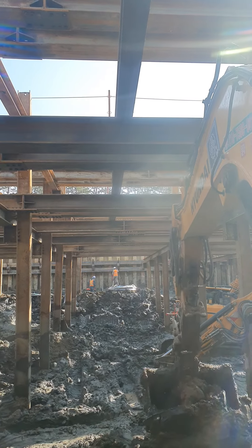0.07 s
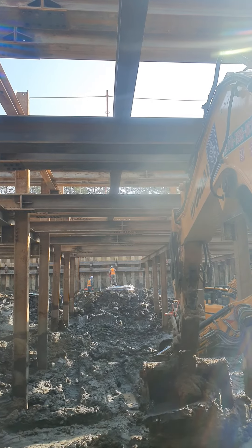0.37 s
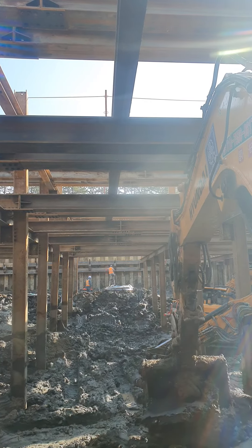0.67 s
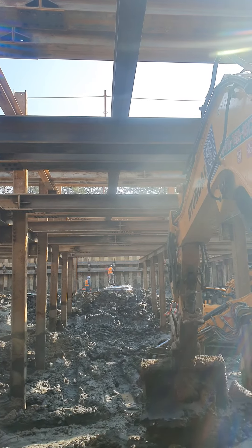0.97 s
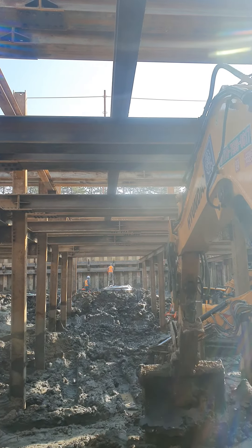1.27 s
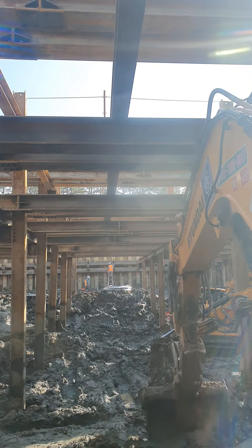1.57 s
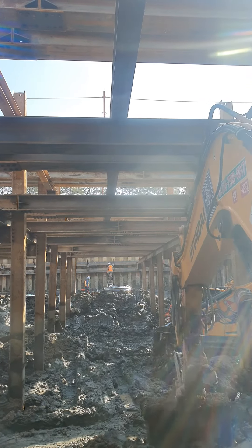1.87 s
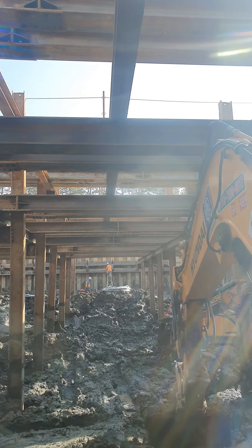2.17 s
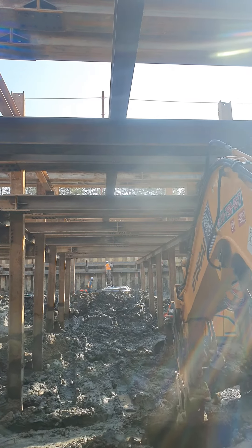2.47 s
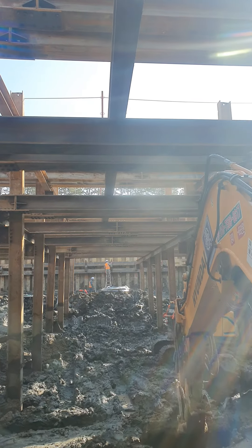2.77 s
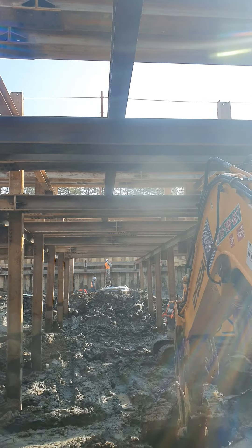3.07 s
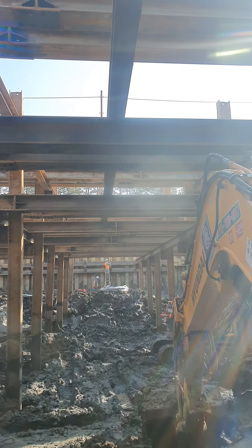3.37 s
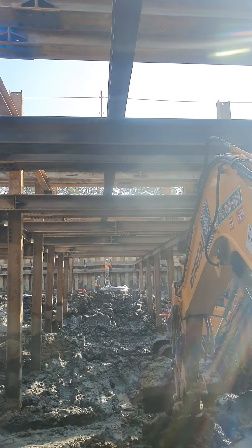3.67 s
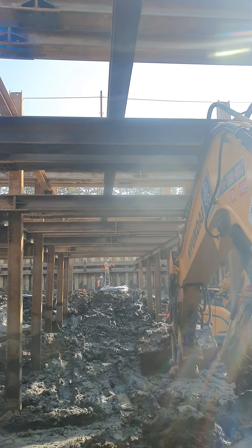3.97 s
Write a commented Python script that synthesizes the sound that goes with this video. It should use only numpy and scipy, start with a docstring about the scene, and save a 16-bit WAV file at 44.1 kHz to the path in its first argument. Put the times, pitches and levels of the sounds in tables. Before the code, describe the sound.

An excavator's diesel engine drones and clatters steadily, with a few bucket knocks.

```python
"""A building pit: an excavator digs mud under steel struts. Its four-cylinder diesel drones and clatters,
beating against a second engine further off. Pump pistons hum, valves hiss as the arm moves, a faint whine
follows the crank and the site rumbles. Slack bucket pins knock and the pit answers; the bucket scrapes
once through wet spoil. Reflections between the struts comb the clatter and hiss."""
import sys
import numpy as np
from scipy import signal
from scipy.fft import rfft, irfft, dct
from scipy.io import wavfile

SR = 44100
rng = np.random.default_rng(int(sys.argv[2]) if len(sys.argv) > 2 else 0)


def transcribe(signal):
    """Save signal, clipped to [-1, 1], as a 16-bit WAV file at the path in sys.argv[1]."""
    frames = np.atleast_2d(signal).T
    limited = np.clip(frames, -1, 1)
    pcm = np.round(limited * 32767).astype(np.int16)
    wavfile.write(sys.argv[1], SR, pcm)


N = 176400
TIME_S = np.arange(N) / SR
BIN_HZ = np.arange(N // 2 + 1) * SR / N
WAVER_DB, WAVER_HZ = 2, 3.9  # weak tones

# Phase between the two pickup ports. Each row: frequency in Hz, left minus right in radians.
PORT_PHASE = [(150, 0), (290, -1), (575, -1.87), (1100, -2.5), (5000, -5)]


def undb(db):
    """Decibels to gain."""
    return 10 ** (np.asarray(db) / 20)


def unit(x):
    """Scale to rms 1."""
    return x / np.sqrt(np.mean(x ** 2))


def curve(table, column=1):
    """One column of a time table at every sample."""
    rows = np.array(table, float)
    return np.interp(TIME_S, rows[:, 0], rows[:, column])


def per_bin(table):
    """A frequency table at every spectral bin."""
    rows = np.array(table, float)
    return np.interp(np.log(BIN_HZ + 1e-3), np.log(rows[:, 0]), rows[:, 1])


def colour(x, spectrum):
    """Filter, then scale to rms 1. Each spectrum row: frequency in Hz, relative density in dB."""
    return unit(irfft(rfft(x) * undb(per_bin(spectrum)), N))


def noise(spectrum):
    """Coloured noise on three paths."""
    return colour(rng.standard_normal((3, N)), spectrum)


def walk(corner_hz):
    """Slow random drift, rms 1."""
    return unit(irfft(rfft(rng.standard_normal(N)) * (BIN_HZ > 0) / (1 + (BIN_HZ / corner_hz) ** 4), N))


def tone(turns):
    """Sine of rms 1, random starting phase."""
    return np.sqrt(2) * np.sin(2 * np.pi * (turns + rng.random()))


def ports(turns):
    """Stereo sine of rms 1 from the right; the left port lags."""
    mean_hz = (turns[-1] - turns[0]) * SR / N
    lead_rad = per_bin(PORT_PHASE)[int(mean_hz * N / SR)]
    return np.sqrt(2) * np.cos(2 * np.pi * turns + np.array([[lead_rad], [-lead_rad]]) / 2)


def spread(paths):
    """Mix three paths to stereo: direct (left lags), left reflection, right reflection."""
    # Each row: frequency in Hz, share of power arriving directly.
    direct_share = [(120, 1), (250, 0.7), (600, 0.68), (1200, 0.66), (2400, 0.12)]
    share = np.clip(per_bin(direct_share), 0, 1)
    shift = np.exp(.5j * per_bin(PORT_PHASE))
    direct = rfft(paths[0]) * np.array([shift, 1 / shift]) * np.sqrt(share)
    return irfft(direct + rfft(paths[1:]) * np.sqrt(1 - share), N)


def swells(events, spectrum):
    """Stereo noise with one Gaussian swell per event."""
    envelope = sum(undb(db) * np.exp(-.5 * ((TIME_S - centre_s) / width_s) ** 2)
                   for centre_s, width_s, db in events)
    return spread(noise(spectrum)) * envelope


def exhaust(crank):
    """Tones locked to the crank: the strong ones steady, the weak ones wavering."""
    # Each row: multiple of the crank rate, relative level in dB.
    strong_tones = [(2, -17), (4, 0)]
    weak_tones = [(6, -27.5), (7, -34), (8, -34.5), (9, -29.5), (11, -38.5), (12, -34), (21.5, -28.5),
                  (24, -29.5)]
    # Each row: time in seconds, level in dB.
    level = [(0, -10), (.7, -11.1), (1.1, -10.2), (1.6, -12.1), (2.1, -10.1), (4, -10.2)]
    drone = sum(undb(db) * ports(multiple * crank) for multiple, db in strong_tones)
    for multiple, db in weak_tones:
        drone += undb(db + WAVER_DB * walk(WAVER_HZ)) * ports(multiple * crank + rng.random())
    return drone * undb(curve(level))


def second_engine(crank):
    """A distant engine fires slightly slower and beats against the firing tone."""
    # Each row: time in seconds, firing rate deficit in Hz, level in dB.
    running = [(0, 4.85, -29), (1.5, 4.42, -27.5), (3.1, 3.6, -32), (4, 3.6, -33)]
    slip_turns = np.cumsum(curve(running)) / SR
    return undb(curve(running, 2)) * ports(2 * crank - slip_turns)


def clatter(crank):
    """Each firing shakes the block; part of the rattle repeats every two crank turns."""
    # Block and fan. Each row: frequency in Hz, density in dB.
    spectrum = [(60, -40.5), (205, -11.5), (265, 0.5), (340, -2.5), (420, 0), (510, -6), (715, 4),
                (830, -6.5), (1050, -8), (1400, -6), (2000, -14), (2900, -20), (4000, -35), (15000, -54)]
    # Each row: time in seconds, level in dB.
    level = [(.2, -29.5), (1.1, -29.5), (1.6, -27.5), (2.7, -28.5), (3.3, -30)]
    decay_firings, depth, repeat_share = 0.53, 0.24, 0.31
    pulses = unit(np.exp(-(2 * crank % 1) / decay_firings))
    cycle_sample = ((crank / 2 % 1) * 2 * N / crank[-1]).astype(int)
    repeating = np.sqrt(repeat_share) * rng.standard_normal((3, N))[:, cycle_sample]
    fresh = np.sqrt(1 - repeat_share) * rng.standard_normal((3, N))
    rattle = (repeating + fresh) * (1 - depth + depth * pulses)
    return spread(struts(colour(rattle, spectrum))) * undb(curve(level))


def struts(paths):
    """Reflections between the struts add narrow, steady peaks and dips, different on each path."""
    ripple_db, step_hz, full_depth_hz = 4.5, 27.975, 1200
    teeth = rng.standard_normal((4000, 3)).T
    ripple = np.array([np.interp(BIN_HZ / step_hz, np.arange(len(row)), row) for row in teeth])
    depth_db = ripple_db * np.minimum(BIN_HZ / full_depth_hz, 1)
    keep_power = np.exp(-np.log(undb(depth_db)) ** 2)
    return irfft(rfft(paths) * undb(depth_db * ripple) * keep_power, N)


def pump(crank):
    """Pump pistons hum as the oil pressure changes; the high overtones arrive by reflection."""
    # Each row: time in seconds, piston tone in dB, its octave in dB.
    levels = [(0, -35.5, -30.5), (0.4, -33, -27.5), (0.62, -28.5, -31), (0.95, -32, -28.5),
              (1.4, -27.5, -28.5), (1.55, -29.5, -40.5), (1.7, -26, -42.5), (1.82, -36, -40),
              (2.02, -34.5, -30), (2.22, -33.5, -29), (2.38, -29.5, -36), (2.8, -29, -32.5),
              (3.05, -30.5, -30.5), (3.27, -26, -23.5), (3.5, -25.5, -36.5), (3.7, -27.5, -28),
              (4.0, -31.5, -34)]
    # Each row: multiple of the piston rate, level in dB.
    overtones = [(3, -50), (4, -54), (5, -52), (6, -57)]
    pistons, fifth_db = 10, -14.5
    strokes = pistons * crank
    piston_tone = ports(strokes + rng.random())
    fifth = undb(fifth_db + WAVER_DB * walk(WAVER_HZ)) * ports(1.5 * strokes)
    octave = undb(curve(levels, 2) + 0.89 * walk(15)) * ports(2 * strokes + rng.random())
    hum = undb(curve(levels)) * (piston_tone + fifth) + octave
    for multiple, db in overtones:
        for side in hum:
            side += undb(db + WAVER_DB * walk(WAVER_HZ)) * tone(multiple * strokes + walk(0.63) / 10)
    return hum


def whine(crank):
    """A belt-driven part, probably the fan, sings faintly and unsteadily."""
    # Each row: time in seconds, level in dB.
    level = [(1.0, -48), (1.5, -41.5), (2.3, -44), (3.7, -38.5)]
    crank_multiple = 14.8
    gain = undb(curve(level) + WAVER_DB * walk(WAVER_HZ))
    return gain * ports(crank_multiple * crank + walk(WAVER_HZ) / 10)


def valves():
    """Oil hisses through the valves as the arm moves, with brief spurts."""
    # Each row: frequency in Hz, density in dB.
    hiss_spectrum = [(900, -8.5), (1300, 6.5), (1900, 0.5), (2800, 2.5), (4000, -2.5), (6400, -5.5),
                     (9000, -17), (15000, -37.5)]
    sizzle_spectrum = [(5000, -30), (9000, 3), (13000, 3.5), (15500, 7)]
    spurt_spectrum = [(4000, -18.5), (10500, 0), (13000, -21)]
    # Each row: time in seconds, level in dB (hiss: relative to hiss_db).
    hiss_level = [(0.33, -1.5), (0.46, 2.3), (0.65, 3.6), (0.9, 3.9), (1.1, 2), (1.3, -3), (1.46, 1.8),
                  (1.66, -1), (2.0, 1.3), (2.2, .2), (2.85, .2), (3.1, 2.4), (3.23, -4.3), (3.38, -3.8),
                  (3.54, -.5), (3.75, -4.4)]
    sizzle_level = [(.6, -51), (1.2, -49.5), (1.8, -56.5), (2.85, -54.5), (3.2, -62)]
    # Each row: centre in seconds, half width in seconds, level in dB.
    spurts = [(2.228, .02, -53.5), (2.86, .035, -56.5)]
    hiss_db = -42.5
    hiss = noise(hiss_spectrum) * undb(hiss_db + curve(hiss_level) + .5 * walk(11))
    sizzle = noise(sizzle_spectrum) * undb(curve(sizzle_level) + 1.1 * walk(10))
    return spread(struts(hiss + sizzle)) + swells(spurts, spurt_spectrum)


def rumble():
    """Steady site rumble with two deep swells."""
    # Each row: frequency in Hz, density in dB.
    site_spectrum = [(15, -21.5), (35, -0.5), (50, -0.5), (75, -2), (135, 2), (220, -3.5), (600, -48.5)]
    boom_spectrum = [(12, -24), (42, 2), (130, -57.5)]
    # Each row: centre in seconds, half width in seconds, level in dB.
    booms = [(0.95, .1, -33.5), (2.08, 0.11, -27.5)]
    site_db = -33
    return spread(noise(site_spectrum)) * undb(site_db) + swells(booms, boom_spectrum)


def bucket_knocks():
    """Slack pins knock: a dull crack, the pit's echo, a ring of mud-caked steel that varies by hit."""
    # Each row: start in seconds, level in dB, tilt in dB per octave, relative ring level in dB.
    knocks = [(1.498, -25, -0.5, -10), (1.748, -14.5, 0.04, -7), (1.809, -24, 1, -18.5),
              (1.823, -17.5, -.5, -16.5), (1.888, -18.5, -0.5, -14), (1.949, -23.5, 0, -12.5),
              (1.967, -21.5, -5.5, -2), (2.996, -25, -.5, -3.5), (3.073, -24.5, -2.5, -9.5)]
    # Each row: frequency in Hz, density in dB.
    crack_spectrum = [(100, -22.5), (430, 2), (780, 6.5), (1200, -2), (3000, -13), (15000, -48)]
    # Each row: frequency in Hz, relative level in dB, T60 in seconds.
    steel_modes = [(437, 0, 0.14), (760, -5.5, 0.071)]
    attack_s, crack_t60_s, pitch_scatter = 0.003, 0.072, 0.018
    pit_t60_s, pit_db = 0.31, -20
    octaves = np.log2(np.maximum(BIN_HZ, 300) / 800)
    paths = np.zeros((3, N))
    for start_s, db, tilt_db, ring_db in knocks:
        age_s = np.maximum(TIME_S - start_s, 0)
        fade = lambda t60_s: undb(-60 * age_s / t60_s)
        crack = irfft(rfft(noise(crack_spectrum)) * undb(tilt_db * octaves), N)
        knock = crack * (fade(crack_t60_s) + undb(pit_db) * fade(pit_t60_s))
        for mode_hz, mode_db, t60_s in steel_modes:
            ring_hz = mode_hz * (1 + pitch_scatter * rng.standard_normal())
            knock[0] += undb(ring_db + mode_db) * fade(t60_s) * tone(ring_hz * age_s)  # direct path only
        paths += undb(db) * np.minimum(age_s / attack_s, 1) * knock
    return spread(paths)


def bucket_scrape():
    """The bucket grinds through wet spoil in a short, uneven swell."""
    # Each row: centre in seconds, half width in seconds, level in dB.
    scrapes = [(2.96, .095, -30.5)]
    # Each row: frequency in Hz, density in dB.
    spectrum = [(100, -14.5), (270, 5.5), (420, 2.5), (720, -2.5), (1100, -17.5), (4000, -49)]
    return swells(scrapes, spectrum) * undb(walk(40))


def scene():
    """One crankshaft times the engine and pump sounds; site, valves and bucket add to them."""
    # Engine speed, sagging under load. Each row: time in seconds, speed in rpm.
    speed = [(0, 1719), (0.42, 1719), (0.66, 1745), (0.85, 1730), (1.2, 1726), (1.48, 1752), (1.66, 1750),
             (1.87, 1735), (2.2, 1727), (2.8, 1727), (3.0, 1699), (3.15, 1713), (3.4, 1719), (3.65, 1702),
             (4.0, 1717)]
    crank = np.cumsum(curve(speed)) / 60 / SR  # turns
    site = rumble() + second_engine(crank)
    machine = exhaust(crank) + clatter(crank) + pump(crank) + whine(crank) + valves()
    return site + machine + bucket_knocks() + bucket_scrape()


def record(dry):
    """The two ports differ a little in colour; the top is cut."""
    # Each row: frequency in Hz, left minus right in dB.
    balance = [(120, -0.9), (290, -1), (420, 0.5), (575, -4.5), (750, 2), (2000, -0.5), (5000, -3),
               (13000, 1)]
    cutoff_hz = 15750
    left_db = np.repeat(per_bin(balance), 2)[:N] / 2  # two DCT bins per FFT bin
    spectrum = dct(dry, norm="ortho") * undb(np.array([left_db, -left_db]))
    heard = dct(spectrum, type=3, norm="ortho")
    return signal.sosfilt(signal.ellip(10, .2, 80, cutoff_hz, fs=SR, output="sos"), heard)


dry = scene()
out = record(dry)
transcribe(out)
```